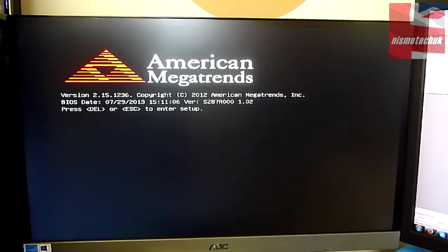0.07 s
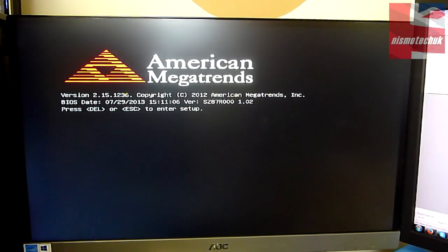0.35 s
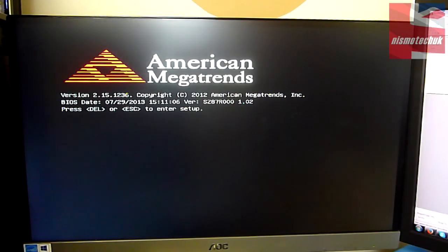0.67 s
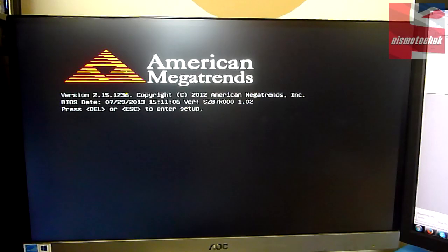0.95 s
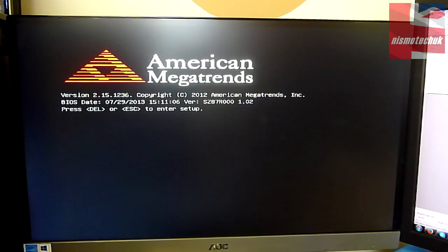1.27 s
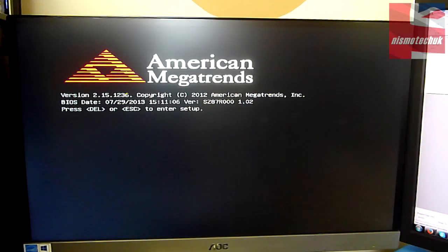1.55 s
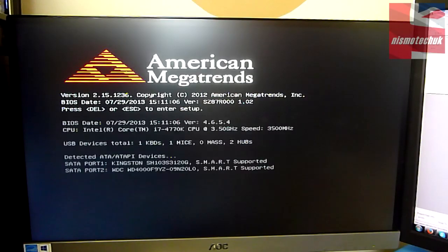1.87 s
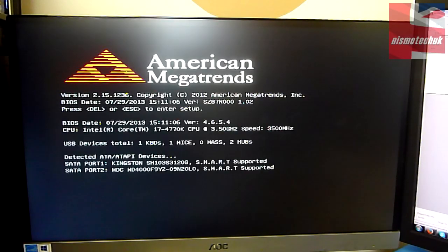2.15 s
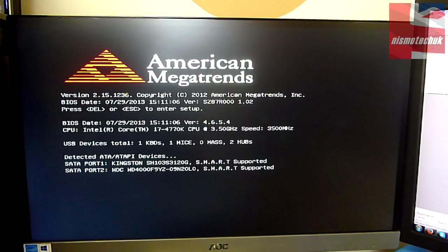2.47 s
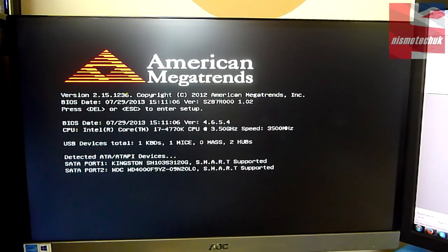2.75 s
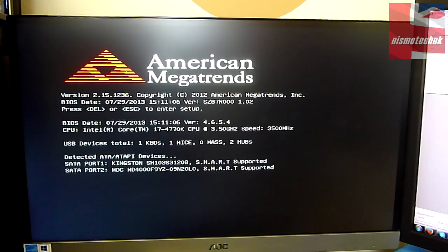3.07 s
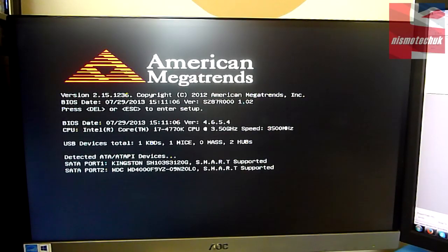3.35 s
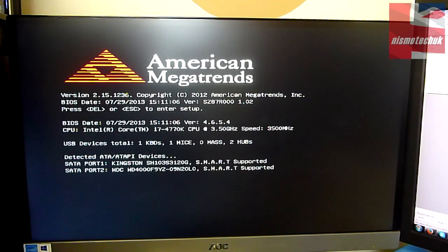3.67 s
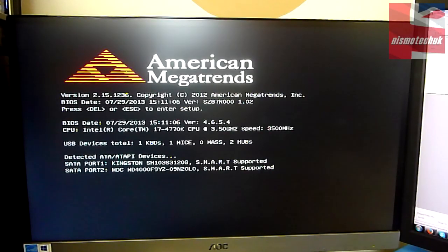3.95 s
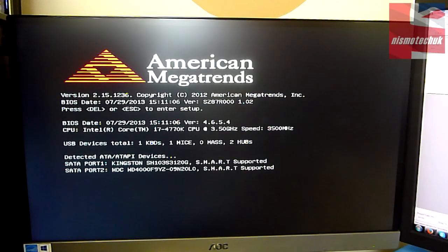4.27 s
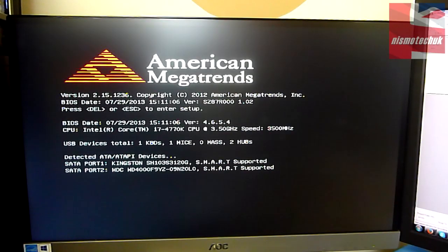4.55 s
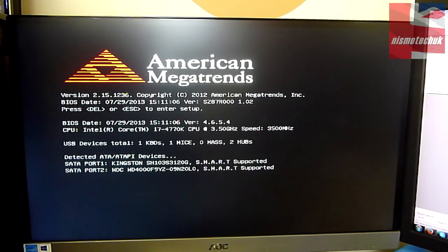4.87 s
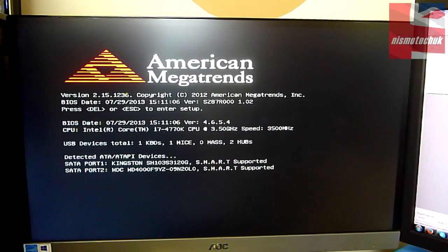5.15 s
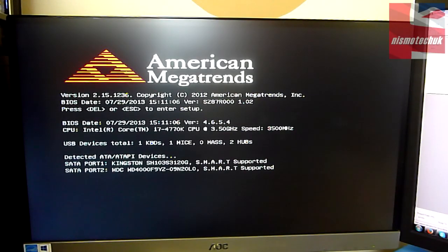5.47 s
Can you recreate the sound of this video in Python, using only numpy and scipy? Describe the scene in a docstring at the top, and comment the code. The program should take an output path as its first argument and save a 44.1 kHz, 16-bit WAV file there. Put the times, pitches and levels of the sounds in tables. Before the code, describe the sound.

A desktop computer runs in a small room, close to the microphone, with a steady low hum, rushing fan air, faint thin whines and a deep, slow throb. Right at the start, six soft, dull knocks sound on the desk in an even rhythm, the last with a faint rustle. The whir carries on, with a tiny tick after about three seconds and one softer bump near the end.

```python
"""A small room, one microphone near an idling desktop computer. From the start there is a low hum
with disk and fan tones, thin whines of motors and bearings, air rushing through the case and the
deep throb of two beating rotors. In the first second and a half six soft, dull knocks ring the
desk, the last with a brief rustle. A tiny tick follows after three seconds, and near five
seconds one faint bump."""
import sys
import numpy as np
from scipy import signal
from scipy.fft import rfft, irfft
from scipy.io import wavfile

SR = 44100
rng = np.random.default_rng(int(sys.argv[2]) if len(sys.argv) > 2 else 0)


def transcribe(u):
    """Save the signal u as a 16-bit wav file named by the first command-line argument.

    u: samples, shape (n,) or (channels, n), limited to [-1, 1]; the rate is SR.
    q: integer samples, one column per channel.
    """
    v = np.clip(np.atleast_2d(u).T, -1, 1)
    q = np.round(v * 32767).astype(np.int16)
    wavfile.write(sys.argv[1], SR, q)


N = 251887
TIME = np.arange(N) / SR
FREQ = np.maximum(np.arange(N // 2 + 1) * SR / N, 1)


def undb(db):
    """Decibels to gain."""
    return 10 ** (np.asarray(db) / 20)


def walk(rate_hz):
    """A smooth random drift, mostly slower than rate_hz, with spread 1."""
    drift = irfft(rfft(rng.standard_normal(N)) / (1 + (FREQ / rate_hz) ** 4), N)
    return (drift - drift.mean()) / drift.std()


def tone(turns, db, flutter_db):
    """A sine on a running count of turns; turbulence makes its level flutter."""
    amplitude = np.sqrt(2) * undb(db + flutter_db * walk(4.8))
    return amplitude * np.sin(2 * np.pi * (turns + rng.random()))


def spin(hz, wander):
    """Turns made by a rotor whose speed wanders by a small share."""
    return np.cumsum(hz * (1 + wander * walk(2.02))) / SR


def rotor(hz, harmonics, wander, flutter_db):
    """Harmonics locked to one rotor; the higher ones flutter more."""
    turns = spin(hz, wander)
    return sum(tone(round(k) * turns, db, flutter_db * k ** 0.16) for k, db in harmonics)


# The strongest tone at the microphone, with overtones. Each row: harmonic number, rms level in dB.
HUM_HARMONICS = [(1, -44), (2, -60.5), (4, -67), (5, -66)]

def hum(hz=89.7):
    """A strong low hum, almost steady in pitch and level."""
    return rotor(hz, HUM_HARMONICS, wander=0.00064, flutter_db=-0.23)


# The hard disk inside the case. Each row: harmonic number, rms level in dB.
DISK_HARMONICS = [(1, -55), (4, -66.5)]

def disk(hz=120.0):
    """The spindle holds its speed closely while its level flutters."""
    return rotor(hz, DISK_HARMONICS, wander=0.0001, flutter_db=3.0)


# The blade tone of one fan. Each row: harmonic number, rms level in dB.
BLADE_HARMONICS = [(1, -60.5), (2, -53), (6, -64.5), (7, -67), (10, -67), (19, -69)]
# The drone of the slower fans. Each row: frequency in Hz, rms level in dB.
DRONE_TONES = [(27.3, -58), (44.8, -68), (48.6, -58.5), (155.4, -57), (172.3, -60), (312.4, -72.5),
               (358.6, -75), (493.4, -66.5), (532.9, -72), (640.7, -73.5), (799, -72.5)]

def fans(blade_hz=75.65):
    """Passing blades chop the air into harmonics; the slower fans add tones that each waver alone."""
    blades = rotor(blade_hz, BLADE_HARMONICS, wander=0.0013, flutter_db=1.15)
    drone = sum(tone(spin(hz, wander=0.001), db, flutter_db=4.5) for hz, db in DRONE_TONES)
    return blades + drone


# Thin whines, faint at the microphone. Each row: frequency in Hz, rms level in dB.
WHINE_TONES = [(1303, -72.5), (1418, -78), (1512, -72), (2213, -76), (2310, -85), (2509, -81), (2606, -74),
               (2690, -86), (2918, -79), (3295, -79.5), (3908, -79), (4124, -83), (4662, -83),
               (4780, -85.5), (5055, -91), (5200, -93), (5766, -88), (8280, -94), (8640, -89.5)]

def whine():
    """Motors and bearings sing unrelated high tones, each wavering alone."""
    return sum(tone(spin(hz, wander=0.000906), db, flutter_db=2.0) for hz, db in WHINE_TONES)


def room_response(share, t60, count=40):
    """The direct path to the microphone plus sparse wall echoes: a fine ripple in the spectrum."""
    delay_s = rng.uniform(0.001999, 0.03, count)
    echoes = np.zeros(N)
    echoes[(delay_s * SR).astype(int)] = rng.standard_normal(count) * undb(-60 * delay_s / t60)
    wet = share / np.sqrt(1 + (FREQ / 7000) ** 2) * FREQ / (FREQ + 300)  # less in treble and bass
    return (1 + wet * rfft(echoes) / np.linalg.norm(echoes)) / np.sqrt(1 + wet ** 2)


# Rushing air before case and room colour it. Each row: frequency in Hz, density in dB per Hz.
AIR_SPECTRUM = [(10, -88), (60, -81), (110, -78), (230, -76), (440, -82), (600, -83), (850, -82.5),
                (1100, -88), (1950, -92), (2750, -91.5), (3600, -100.3), (5500, -107), (9500, -113.8),
                (15500, -117.2)]
# Case resonances that the air excites. Each row: centre in Hz, width in Hz, lift in dB.
CASE_RESONANCES = [(141, 20.5, 13), (154.8, 24, 11), (326, 20.5, 6), (410, 44, 6.5), (709, 92, 3),
                   (1416, 71, 6), (1710, 260, 3), (2270, 160, 3), (4620, 870, 4.5), (5890, 89, 7.5),
                   (7210, 150, 4.5), (8170, 370, 4.5)]

def airflow():
    """Turbulence of the fans, coloured by the case and the room."""
    hz, db = np.transpose(AIR_SPECTRUM)
    colour_db = np.interp(np.log(FREQ), np.log(hz), db)
    case_power = 1 + sum((undb(2 * lift_db) - 1) / (1 + (2 * (FREQ - centre) / width) ** 2) ** 2
                         for centre, width, lift_db in CASE_RESONANCES)
    gain = undb(colour_db) * np.sqrt(case_power * SR / 2) * room_response(share=0.25, t60=0.18)
    rush = irfft(rfft(rng.standard_normal(N)) * gain, N)
    return rush * undb(0.14 * walk(2.3))


def throb(hz=22.2, beat_period_s=4.3, lull_s=2.82):
    """Two slow rotors drift out of step and back, so their deep throb fades and swells again."""
    turns = hz * TIME + rng.random()
    slip = (TIME - lull_s) / beat_period_s
    stronger = undb(-46.5) * np.sin(2 * np.pi * turns)
    weaker = undb(-48) * np.sin(2 * np.pi * (turns + slip))
    return np.sqrt(2) * (stronger - weaker)


# Six knocks on the desk, then the late bump.
# Each row: start in seconds, relative level in dB, favoured pitch in Hz.
DESK_KNOCKS = [(0.002, -8, 110), (0.206, 0.5, 104), (0.493, 1, 166), (0.775, 2.5, 130), (1.062, -4, 128),
               (1.343, 1.5, 121), (4.967, -5, 150)]
# The desk's modes. Each row: frequency in Hz, relative level in dB, seconds to fall by 60 dB.
DESK_MODES = [(58.3, -37, 0.13), (92.24, -25, 0.22), (124, -33, 0.079), (150, -26.5, 0.13),
              (170, -30.5, 0.14), (199, -39, 0.087)]

def knocks(gain_db=4, contact_s=0.0059, rise_cycles=0.29, reach_octaves=0.58):
    """Each soft push rings the desk; where it lands decides which modes answer most."""
    out = np.zeros(N)
    for start, db, favoured_hz in DESK_KNOCKS:
        age = np.maximum(TIME - start, 0)
        for hz, mode_db, t60 in DESK_MODES:
            share = 1 / (1 + (np.log2(hz / favoured_hz) / reach_octaves) ** 2)
            rise_s = contact_s + rise_cycles / hz  # padded contact: no click, low modes build last
            swell = 1 - np.exp(-(age / rise_s) ** 2)
            decay = undb(db + mode_db - 60 * age / t60)
            out += share * swell * decay * np.sin(2 * np.pi * hz * age)
    return undb(gain_db) * out


def rustle(peak_s=1.325, spread_s=0.02, hz=2850, width_hz=350, db=-63.5):
    """A faint brush of narrow-band noise just before the sixth knock."""
    noise = irfft(rfft(rng.standard_normal(N)) / (1 + (2 * (FREQ - hz) / width_hz) ** 2), N)
    swell = np.exp(-((TIME - peak_s) / spread_s) ** 2)
    return undb(db) * swell * noise / noise.std()


def tick(start_s=3.2655, hz=4800, rise_s=0.001, t60=0.0083):
    """A tiny, bright click that rings very briefly."""
    age = np.maximum(TIME - start_s, 0)
    attack = 1 - np.exp(-(age / rise_s) ** 2)
    return attack * undb(-41 - 60 * age / t60) * np.sin(2 * np.pi * hz * age)


def scene():
    """The running computer and the small sounds at the desk, all at one microphone."""
    computer = hum() + disk() + fans() + whine() + airflow() + throb()
    return (computer + knocks() + rustle() + tick())[None]


def record(dry):
    """The recorder cuts the treble steeply above 15.7 kHz."""
    lowpass = signal.ellip(12, 0.1, 80, 15720, fs=SR, output="sos")
    return signal.sosfilt(lowpass, dry)


dry = scene()
out = record(dry)
transcribe(out)
```